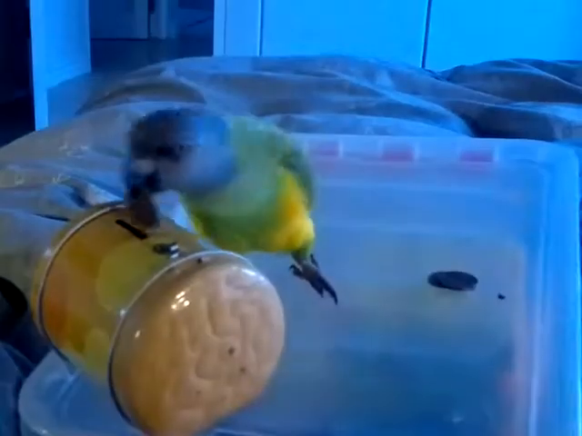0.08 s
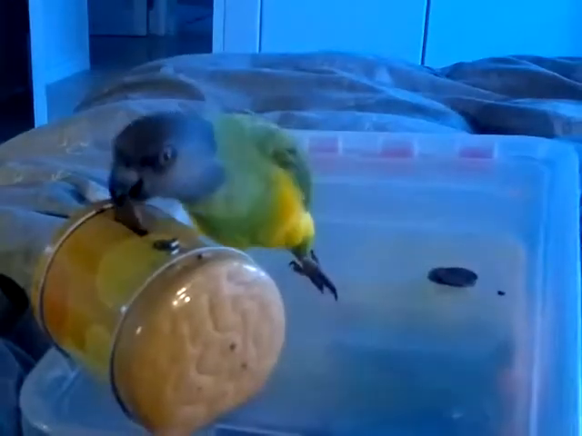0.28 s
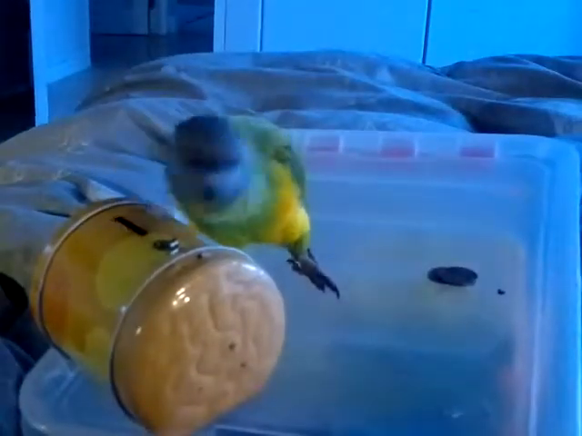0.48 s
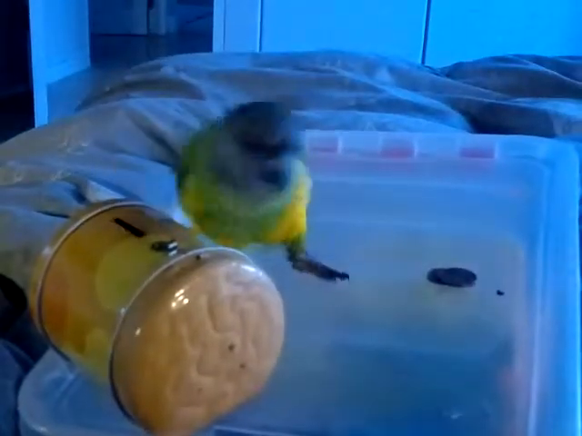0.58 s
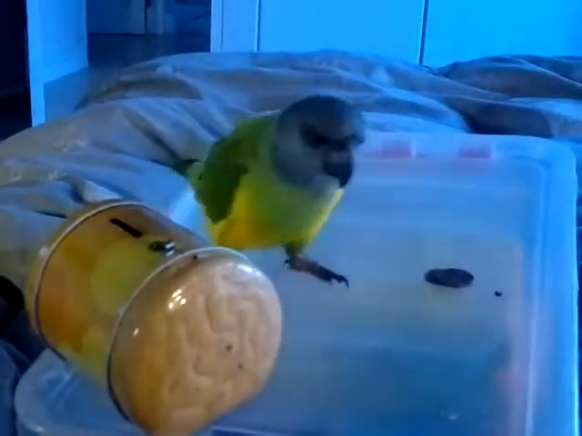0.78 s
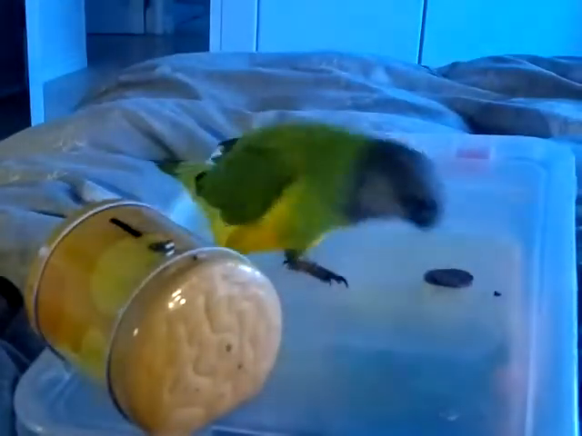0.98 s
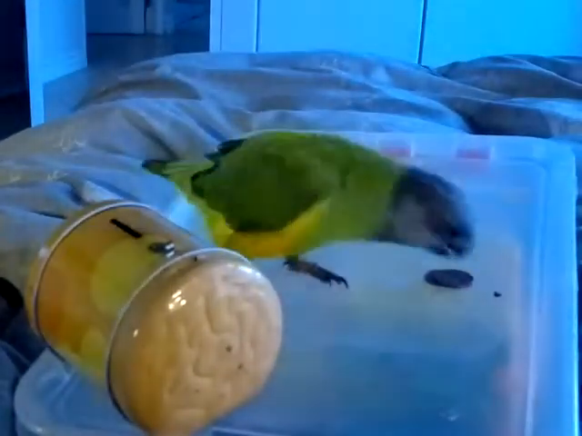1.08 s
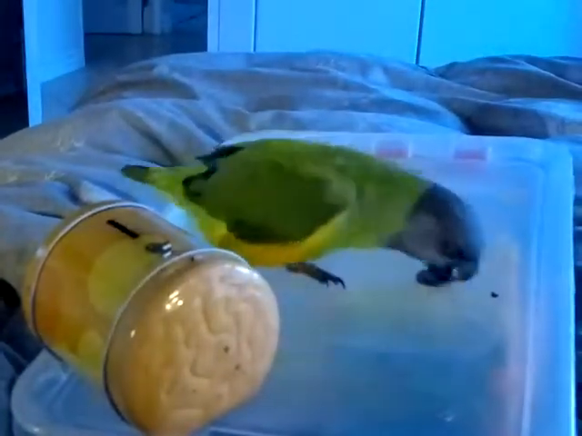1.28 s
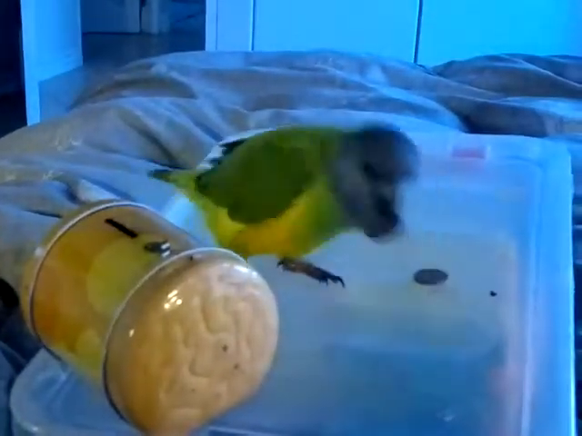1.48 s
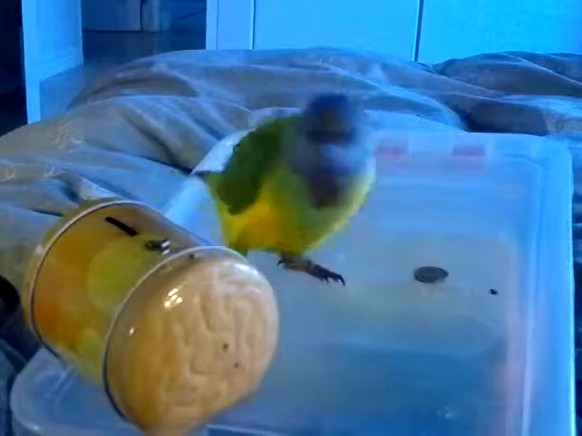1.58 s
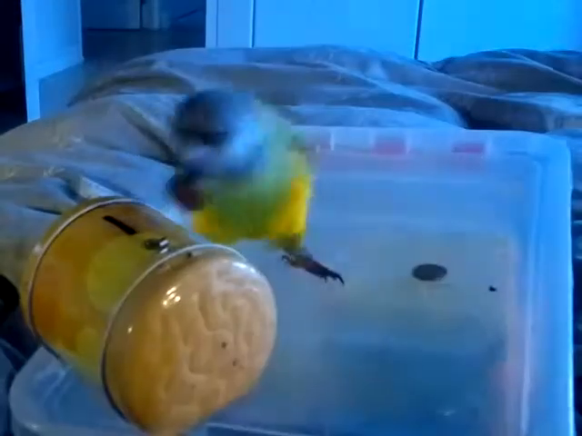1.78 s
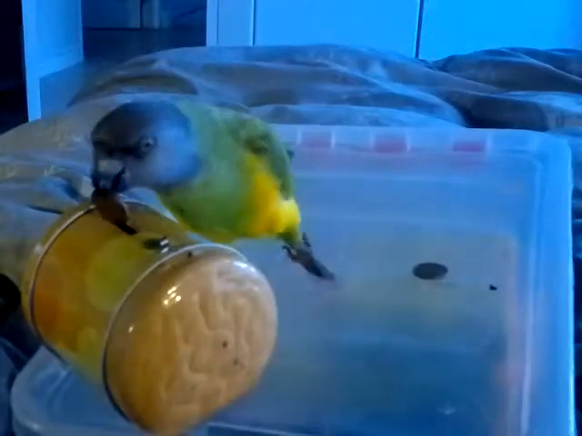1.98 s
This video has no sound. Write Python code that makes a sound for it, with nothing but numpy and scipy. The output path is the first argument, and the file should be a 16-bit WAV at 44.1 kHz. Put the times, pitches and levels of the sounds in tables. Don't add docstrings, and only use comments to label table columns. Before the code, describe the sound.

A coin in a parrot's beak ticks and chatters on a tin bank's rim from 0 to 0.33 seconds, then drops at 0.4, clattering loudly and ringing inside until about 0.65. After a quiet gap, dry beak pecks and brief scrapes on thin plastic run 1.14-1.3. Faint clicks come at 1.6 and 1.7, then softer rim knocks 1.78-1.97. Small soft room, low handling thumps mostly left, faint air.

```python
import sys
import numpy as np
from scipy import signal
from scipy.fft import rfft, irfft
from scipy.io import wavfile
from scipy.ndimage import uniform_filter1d

SR = 44100
rng = np.random.default_rng(int(sys.argv[2]) if len(sys.argv) > 2 else 0)


def gain_from_db(level_db):
    decades = np.asarray(level_db, float) / 20
    return 10 ** decades


def waveform_to_disk(signal):
    frames = np.transpose(np.atleast_2d(signal))
    scaled = np.clip(frames, -1, 1) * 32767
    samples = np.round(scaled).astype(np.int16)
    wavfile.write(sys.argv[1], SR, samples)


N = 88200
SPLIT_HZ = 1222


def shape(x, points):
    hz, db = np.array(points).T
    f = np.fft.rfftfreq(x.shape[-1], 1 / SR) + 1
    gain = gain_from_db(np.interp(np.log(f), np.log(hz), db))
    return irfft(rfft(x) * gain, x.shape[-1])


def butter(x, hz, kind, order=2):
    return signal.sosfilt(signal.butter(order, hz, kind, fs=SR, output="sos"), x)


def fade(t, t60):
    return np.exp(-np.log(1000) * t / t60)


def ports(a, b):
    # frequency in Hz, phase the left leads by in radians, likeness of the ports from 0 to 1.
    port_match = [(100, 0.46, 0.92), (1082, 0.53, 0.94), (1379, 2.5, 1), (1785, 2.5, 0.7), (3000, 3.5, 0.9),
                  (3790, 3.5, 0.4), (4340, 7.5, 0.1), (9146, 18.5, 0.02)]
    hz, turn, like = np.array(port_match).T
    f = np.log(np.fft.rfftfreq(len(a), 1 / SR) + 1)
    turn = np.interp(f, np.log(hz), turn)
    like = np.clip(np.interp(f, np.log(hz), like), 0, 1)
    left = rfft(a)
    right = like * left * np.exp(-1j * turn) + np.sqrt(1 - like ** 2) * rfft(b)
    pair = irfft([left, right], len(a))
    return butter(pair, SPLIT_HZ, "low", order=3), butter(pair, SPLIT_HZ, "high", order=3)


def air():
    # frequency in Hz, level in dB per Hz.
    air_colour = [(20, -1), (60, -21.5), (120, -13), (250, -20), (500, -32), (2700, -41), (8000, -48.5),
                  (15500, -54.5)]
    g = shape(rng.standard_normal((3, N)), air_colour)
    flicker = uniform_filter1d(rng.standard_normal(N), size=2000)
    x = (g[:2] + 0.5 * g[2]) * gain_from_db(0.5 * flicker / flicker.std())
    return x / x.std() * gain_from_db(-59.5)


def thumps():
    # centre in seconds, peak in dB, pitch in Hz.
    swings = [(0.057, -40.5, 38.3), (0.173, -38.5, 37), (0.247, -33, 34.4), (0.327, -31.5, 40.2),
              (0.417, -38, 51), (.5, -66, 35.6), (0.741, -47, 35.6), (0.8, -39.5, 45.6),
              (0.876, -31.5, 51.3), (0.91, -30, 29.96), (.945, -33, 27.85), (0.98, -27, 37.74),
              (1.029, -39.5, 34.6), (1.1, -33.5, 39.7), (1.156, -35, 39.6), (1.257, -33, 30),
              (1.354, -33, 30), (1.549, -42.5, 45.7), (1.624, -33.5, 44.9),  (1.99, -46, 30.2)]
    t = np.arange(N) / SR
    x = np.zeros(N)
    for at, db, hz in swings:
        swell = np.exp(-((t - at) * hz / 0.48) ** 2)
        x += gain_from_db(db) * np.sin(2 * np.pi * hz * (at - t) + 0.35) * swell
    rumble = butter(butter(rng.standard_normal(N), 46, "low", order=3), 16.0, "high")
    x = x + rumble / rumble.std() * gain_from_db(-51.5)
    leak = gain_from_db(-26) * butter(x, 89.1, "high", order=1)
    return np.array([x, leak])


def scrapes():
    # start in seconds, end in seconds, level in dB.
    drags = [
        (1.156, 1.231, -57),
        (1.244, 1.327, -49),
    ]
    t = np.arange(N) / SR
    grit = uniform_filter1d(rng.standard_normal(N), size=90)
    drag = np.zeros(N)
    for start, end, db in drags:
        drag += gain_from_db(db) * np.clip((t - start) / 0.003994, 0, 1) * np.clip((end - t) / 0.049, 0, 1)
    friction = butter(rng.standard_normal((2, N)), [1561, 4520], "band")
    x = sum(ports(*friction))
    return x / x.std() * drag * gain_from_db(4 * grit / grit.std())


def snaps():
    # start in seconds, peak in dB, spray t60 in seconds.
    clicks = [
        (1.1573, -44.5, 0.0274),
        (1.172, -60, .03),
        (1.193, -68, 0.043),
        (1.207, -53, .02),
        (1.2496, -42.5, 0.035),
        (1.2645, -50, 0.0404),
        (1.278, -39, 0.012),
        (1.286, -56, .1),
        (1.612, -46, 0.0199),
        (1.70, -52, 0.019),
    ]
    x, t = np.zeros((2, N + SR)), np.arange(SR // 4) / SR
    for at, db, t60 in clicks:
        i = int(at * SR)
        spray = butter(rng.standard_normal((2, len(t))), [2380, 8900], "band", order=1)
        x[:, i:i + len(t)] += gain_from_db(db) * spray * (fade(t, 0.0024) + 0.4 * fade(t, t60))
    return x[:, :N]


def rings():
    # start in seconds, peak in dB, pitch in Hz, t60 in seconds.
    wall_modes = [(.194, -18.5, 2304, 0.036), (.203, -21.5, 2295, 0.042), (.207, -24.5, 4890, 0.042),
                  (.217, -21, 4380, 0.015), (.218, -35.5, 298, 0.036), (.296, -18, 3580, 0.011),
                  (.296, -26.5, 1084, 0.02), (.297, -34, 261, 0.033), (.308, -19, 3360, 0.013),
                  (.0815, -22, 3990, 0.022), (0.396, -3.5, 3697, 0.021), (.407, -33.5, 221, 0.092),
                  (0.419, -36.5, 100, 0.16), (.4065, -11.5, 657.5, 0.033), (.4075, -14.5, 1008, 0.037),
                  (.408, -2, 3680, 0.016), (.407, -28.5, 430, 0.072), (.419, -19, 636, .05),
                  (.4605, -13.5, 682, 0.031), (.474, -10.5, 1167, 0.027), (.4745, -16, 751, 0.044),
                  (.477, -18, 948, 0.038), (.474, -29, 425, 0.09), (.5105, -23, 680, 0.027),
                  (.5105, -31.5, 424, 0.053), (.556, -28, 750, 0.03), (.556, -33.5, 410, 0.036),
                  (.597, -38.5, 399.3, 0.19), (.622, -33.5, 1100, 0.02), (1.2095, -29, 3800, 0.01),
                  (1.2785, -21, 3650, 0.0044), (1.2787, -18, 2300, 0.0071), (1.2865, -26, 3750, 0.012),
                  (1.782, -38.5, 2485, 0.01), (1.781, -45.5, 349, 0.049), (1.801, -37.5, 4200, 0.033),
                  (1.898, -26, 4563, .03), (1.963, -36, 3972, 0.021), (1.825, -43.5, 407, 0.043)]
    rise_s = 0.002
    x, t = np.zeros(N + SR), np.arange(SR // 4) / SR
    for at, db, hz, t60 in wall_modes:
        i = int(at * SR)
        swell = (1 - np.exp(-t / rise_s)) * fade(t, t60) * 2
        x[i:i + len(t)] += gain_from_db(db) * np.sin(2 * np.pi * hz * t) * swell
    return sum(ports(x[:N], np.roll(x[:N], shift=37)))


def chatter(t, rate, chatter_db, spread_db, length):
    u = rng.random((2, len(t)))
    hit = np.clip((rate / SR - u[0]) * SR / rate * 20, 0, 1)
    size = np.minimum(gain_from_db(chatter_db - spread_db * np.log(u[1] + 1e-4)), 0.6)
    push = hit * np.sign(rng.standard_normal(len(t))) * size * np.exp(-t / length)
    push[0] = 1
    return push


def dense_body(t, colour, t60, low_t60, low_db):
    dense = shape(rng.standard_normal((2, len(t))), colour)
    dense = dense / dense.std()
    crack = gain_from_db(7) * fade(t, 0.012 * min(t60 / 0.089, 1))
    low = butter(dense, SPLIT_HZ, "low") * fade(t, low_t60) * gain_from_db(low_db)
    return dense * (fade(t, t60) + crack) + low


def body_tones(t, modes, ring_db, ring):
    hz, width, db = np.array(modes).T[:, :, None]
    m = rng.standard_normal((4, len(hz), 1))
    tones = []
    for k in range(2):
        level = gain_from_db(db + 3 * m[k])
        wave = np.sin(2 * np.pi * hz * (1 + 0.0074 * m[2]) * t + k * 2 * m[3])
        decay = np.exp(-np.pi * width * t / ring)
        tones.append(np.sum(level * wave * decay, axis=0) * gain_from_db(ring_db))
    return tones


def knocks(rows, modes, colour, *, rate, chatter_db, spread_db, length, ring_db, ring,
           t60, low_t60, low_db, pan_db, low_pan_db, rise):
    n = 8192
    out, t = np.zeros((2, N + 16384)), np.arange(n) / SR
    sides = np.array([[0.5], [-0.5]])
    end_fade = np.cos(np.pi / 2 * t / t[-1])
    onset = (1 - np.exp(-t / rise)) * end_fade
    loudest_db = max(row[1] for row in rows)
    treble = signal.butter(2, 6100, "high", fs=SR, output="sos")
    for at, peak_db, low_body_db, accent_hz in rows:
        push = chatter(t, rate, chatter_db, spread_db, length)
        dense = dense_body(t, colour, t60, low_t60, low_db)
        tone = body_tones(t, modes, ring_db, ring)
        response = ports(dense[0] + tone[0], dense[1] + tone[1])
        low, high = (signal.fftconvolve(v * onset, push[None], axes=1)[:, :n] for v in response)
        dulling = gain_from_db(0.45 * (peak_db - loudest_db)) - 1
        high = high + dulling * signal.sosfiltfilt(treble, high)
        high = high + gain_from_db(5) * butter(high, [accent_hz / 1.22, accent_hz * 1.22], "band", order=1)
        body = high / np.abs(high).max() * gain_from_db(sides * pan_db)
        body = body + low / np.abs(low).max() * gain_from_db(low_body_db + sides * low_pan_db)
        i = int(at * SR)
        out[:, i:i + n] += gain_from_db(peak_db) * body * end_fade
    return out[:, :N]


def tub_pecks():
    # start in seconds, peak in dB, low body in dB, loudest region in Hz.
    contacts = [(1.1363, -48.5, -3, 2970), (1.1555, -49.5, 16.5, 2510), (1.158, -34, -16, 4030),
                (1.168, -39, 8.5, 3820), (1.180, -32.5, 1, 3460), (1.193, -30.5, -8, 3600),
                (1.199, -41, -1, 3740), (1.2055, -34, -28, 3760), (1.2097, -28, -28, 3700),
                (1.241, -32, -1, 2040), (1.2503, -23, -8, 2780), (1.2553, -33.5, -4.5, 3550),
                (1.266, -32.5, 3.5, 3800), (1.2725, -25.5, -5.5, 2597), (1.2787, -17.5, -23, 3800),
                (1.2865, -28.5, -2.5, 3800), (1.298, -56, -4, 4000)]
    # frequency in Hz, width in Hz, level in dB.
    modes = [(113.2, 19, -7.5), (201.6, 41, 3.5), (391, 24.5, -6), (639, 35, -4.5), (1054, 48, -1)]
    # frequency in Hz, level in dB per Hz.
    colour = [(60, -23.5), (197, 11), (500, -19.5), (1030, -1), (2000, -4), (3800, -19), (6000, -31.5),
              (15500, -37.5)]
    tub = knocks(contacts, modes, colour, rate=2788, chatter_db=-23.0, spread_db=3.4, length=0.01396,
                 ring_db=-5.0, ring=0.95, t60=0.00574, low_t60=0.05, low_db=-9,
                 pan_db=6.1, low_pan_db=4.6, rise=0.00013)
    return tub + np.array([[1], [0]]) * gain_from_db(8.5) * butter(tub, [2900, 4900], "band")


def coin_drop():
    # start in seconds, peak in dB, low body in dB, loudest region in Hz.
    contacts = [(.392, -5, -15, 3430), (.3985, -5, -16.5, 3520), (.407, -4.5, -6.5, 3400),
                (.417, -6.5, -20.5, 1950), (.4375, -2, -23, 3580), (.4455, -7.5, -12.5, 3800),
                (.4605, -3.5, -18.5, 3300), (.4745, -3, -11.5, 3650), (.4805, -7.5, -12, 3600),
                (.4915, -15, -17, 3500), (.512, -8, -9, 3860), (.5365, -9.5, -11, 3600),
                (.5485, -15, -4.5, 3050), (.557, -7, -22, 3300), (.592, -16.5, -17, 3300),
                (.6005, -14.5, -9, 3100), (.627, -19, -11.5, 3300)]
    # frequency in Hz, width in Hz, level in dB.
    modes = [(689.4, 71, -5), (740, 51, -4.5), (920, 120, 3), (1194, 220, -4.5), (2472, 17, -21.5),
             (3050, 10, -1), (3210, 25, -9.5), (3300, 53, 1), (3740, 260, 0), (4250, 400, -13.5),
             (5270, 20, -1)]
    # frequency in Hz, level in dB per Hz.
    colour = [(60, -24), (120, -19), (330, -41.5), (540, -25), (720, -11), (1790, -10.5), (3620, -6.5),
              (7000, -11.5), (15500, -22.5)]
    return knocks(contacts, modes, colour, rate=1600, chatter_db=-13.5, spread_db=3.0, length=0.011,
                  ring_db=-9.5, ring=0.78, t60=0.18, low_t60=0.051, low_db=-9.5,
                  pan_db=3.3, low_pan_db=0.6, rise=0.0001)


def rim_knocks():
    # start in seconds, peak in dB, low body in dB, loudest region in Hz.
    contacts = [(.0005, -31, -7, 3260), (.055, -39, -6, 2920), (.0812, -18.5, -62, 2297),
                (.0932, -17.5, -18, 4040), (.1135, -20.5, -38, 3934), (.166, -37, -12.5, 2236),
                (.178, -26.5, -26, 2170), (.1915, -24, -43, 2334), (.201, -17, -27, 2416),
                (.2088, -13, -30, 2653), (.2185, -13, -21, 4443), (.242, -21, -23, 3612),
                (.253, -15, -28, 3102), (.289, -15, -21, 3526), (.274, -22.5, -23.5, 3680),
                (.2957, -10, -25.5, 3390), (.3075, -12, -17.5, 3600), (.332, -34.5, -19.5, 3300),
                (1.782, -25, -13.5, 2213), (1.7955, -20.5, -16.5, 3070), (1.825, -31.5, -6, 3230),
                (1.877, -31, -27, 4500), (1.8965, -15.5, -22.5, 2433), (1.9135, -26, -47, 3300),
                (1.9645, -33.5, -12.5, 3740)]
    # frequency in Hz, width in Hz, level in dB.
    modes = [(114.2, 12, -14), (1100, 110, 0), (2364, 110, -8), (2730, 61, -17.5), (3650, 100, -3.5),
             (4200, 81, -12.5), (4900, 180, -12), (5880, 42, -10.5)]
    # frequency in Hz, level in dB per Hz.
    colour = [(60, -12), (120, -16.5), (330, -14.5), (650, -30.5), (1150, -14.5), (2300, -5), (3900, 1),
              (7000, -8.5), (15500, -19)]
    return knocks(contacts, modes, colour, rate=1623, chatter_db=-7.0, spread_db=1.3, length=0.0084,
                  ring_db=-0.43, ring=0.86, t60=0.12, low_t60=0.12, low_db=2.4,
                  pan_db=1.5, low_pan_db=1.3, rise=0.0015)


def room(send):
    t = np.arange(SR // 2) / SR
    tail = butter(rng.standard_normal((2, len(t))), 6350, "low", order=1)
    tail = sum(ports(*(tail * fade(t, 0.18) * np.clip(t / 0.016, 0, 1))))
    tail = tail / np.sqrt(np.sum(tail ** 2, axis=1, keepdims=True))
    return signal.fftconvolve(send, tail, axes=1)[:, :N]


def noise_gate(hits):
    threshold_db, slope = -56.5, 0.44
    level = np.sqrt(np.abs(uniform_filter1d(np.mean(hits ** 2, axis=0), size=600)))
    return hits * (level / (level + gain_from_db(threshold_db))) ** slope


def dull_left(hits):
    top_hz, shelf_db = 5540, -25
    left = butter(hits[0], top_hz, "low", order=4)
    left = left + gain_from_db(shelf_db) * butter(hits[0], top_hz, "high", order=4)
    return np.array([left, hits[1]])


def scene():
    tin = rim_knocks() + coin_drop() + rings()
    tub = tub_pecks() + snaps() + scrapes()
    hits = tin + tub + room(gain_from_db(-15) * tin + gain_from_db(-20) * tub)
    return dull_left(noise_gate(hits)) + thumps() + air()


def top_cut(x):
    return signal.sosfilt(signal.butter(12, 15690, fs=SR, output="sos"), x)


def record(dry):
    mix = np.clip(dry, -1, 1)
    return top_cut(mix)


dry = scene()
out = record(dry)
waveform_to_disk(out)
```